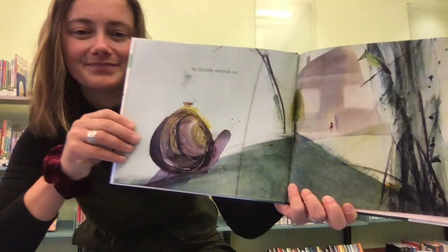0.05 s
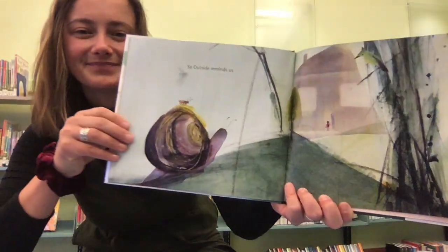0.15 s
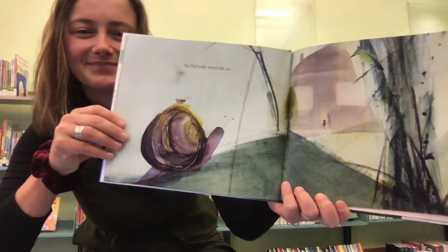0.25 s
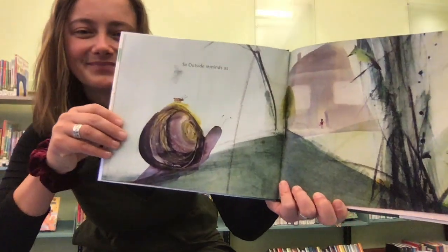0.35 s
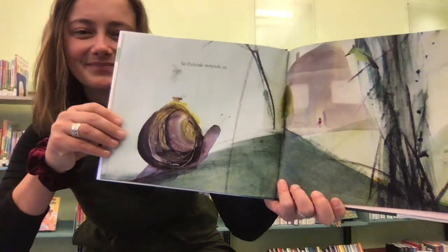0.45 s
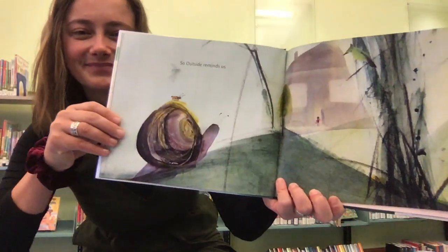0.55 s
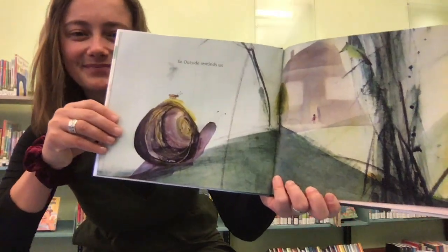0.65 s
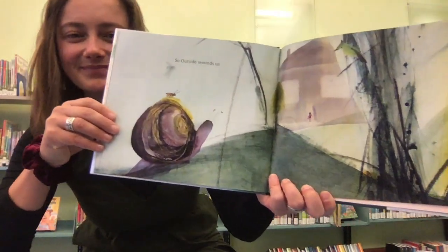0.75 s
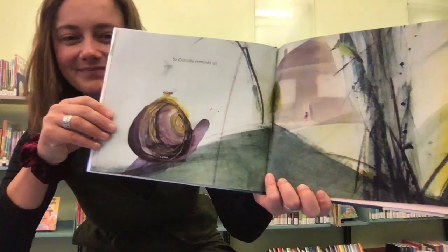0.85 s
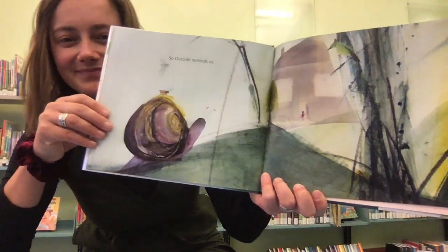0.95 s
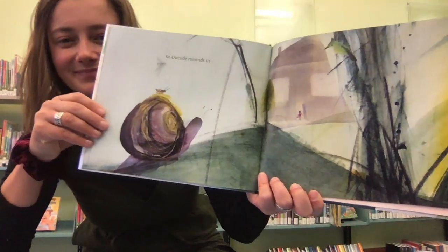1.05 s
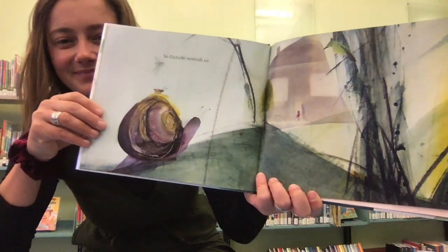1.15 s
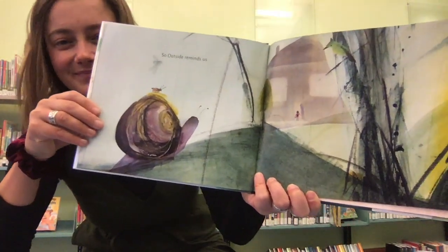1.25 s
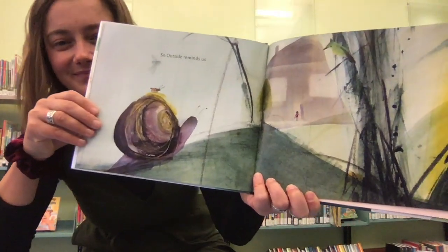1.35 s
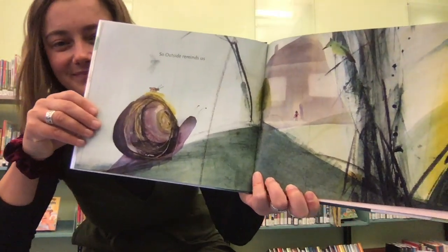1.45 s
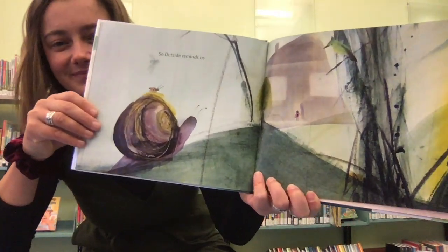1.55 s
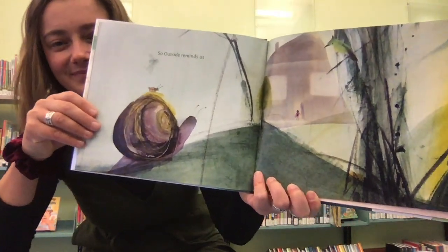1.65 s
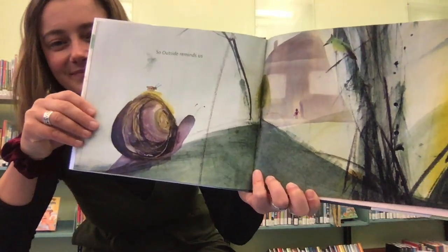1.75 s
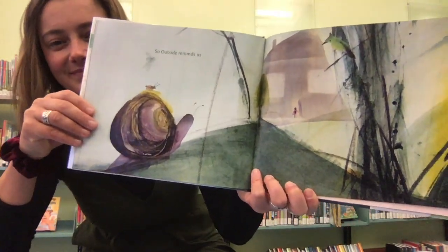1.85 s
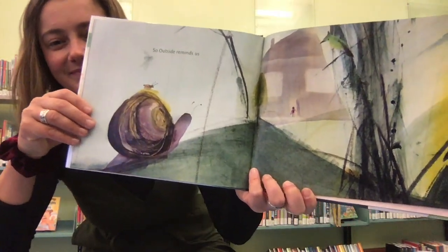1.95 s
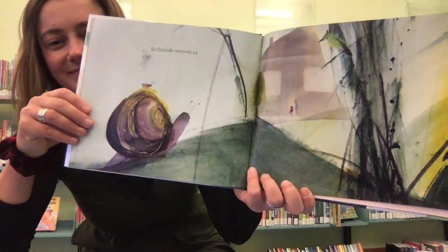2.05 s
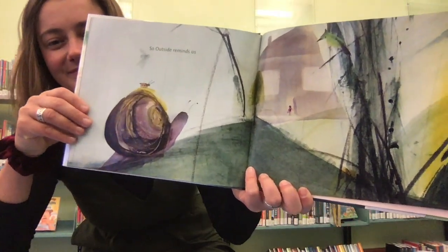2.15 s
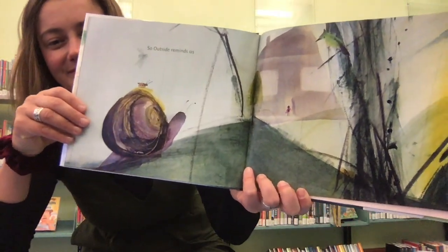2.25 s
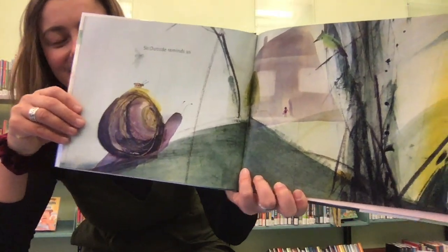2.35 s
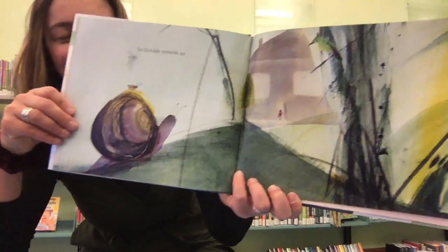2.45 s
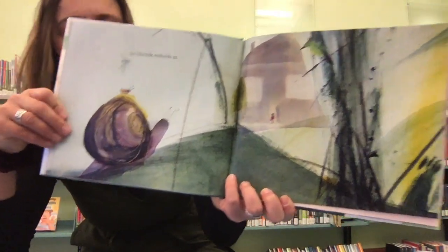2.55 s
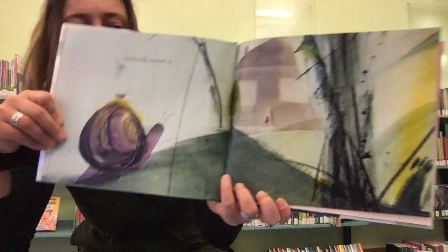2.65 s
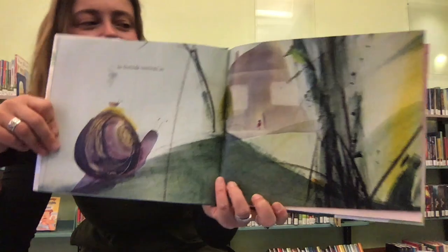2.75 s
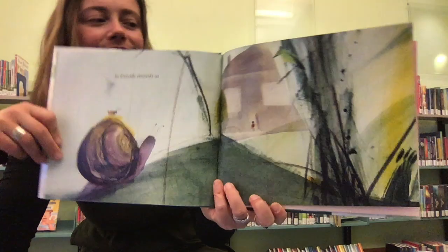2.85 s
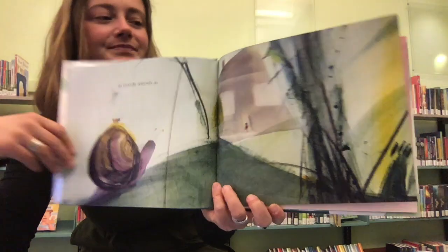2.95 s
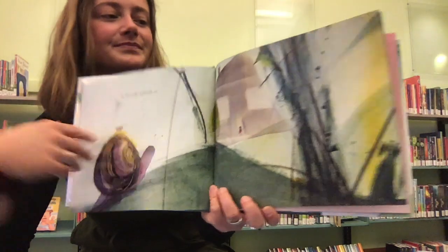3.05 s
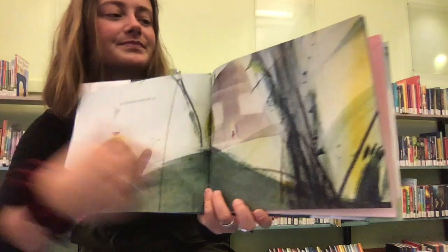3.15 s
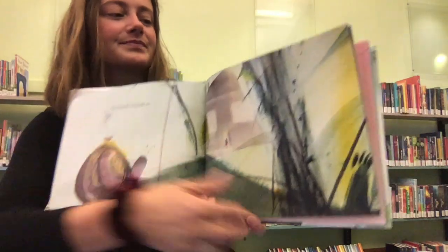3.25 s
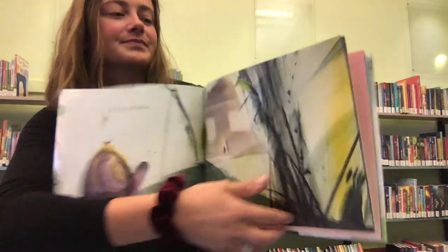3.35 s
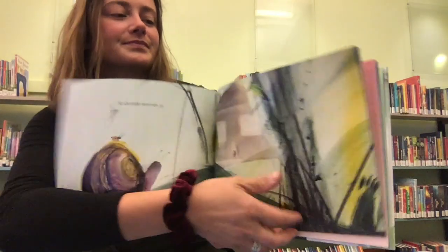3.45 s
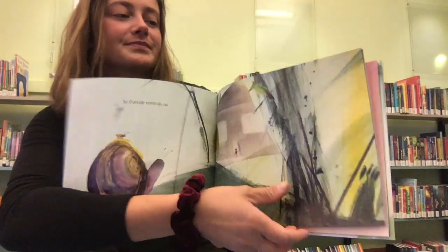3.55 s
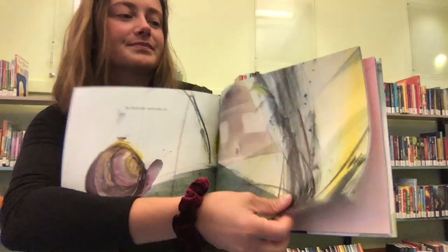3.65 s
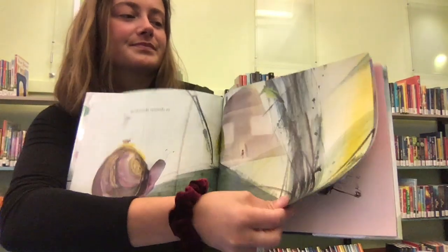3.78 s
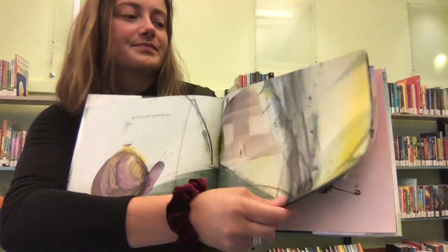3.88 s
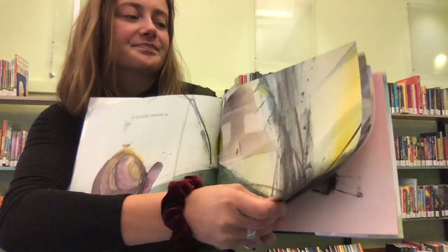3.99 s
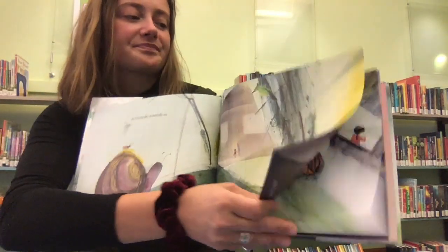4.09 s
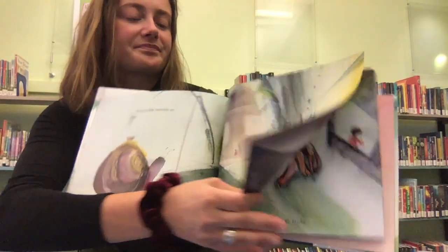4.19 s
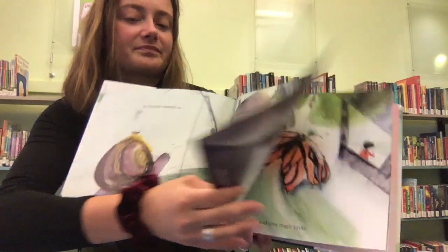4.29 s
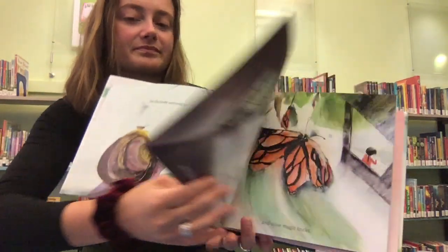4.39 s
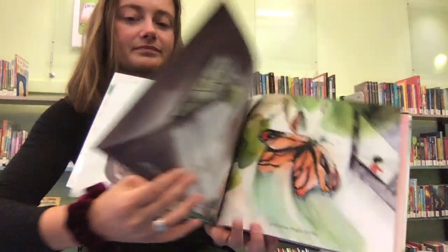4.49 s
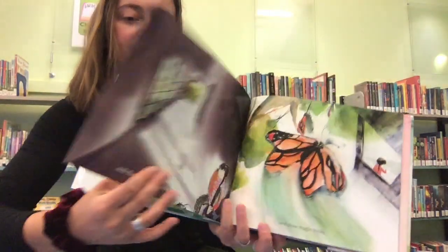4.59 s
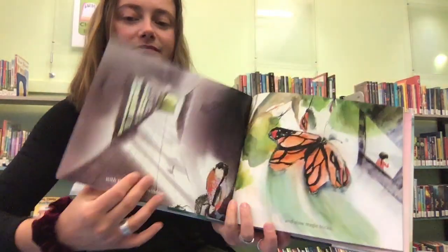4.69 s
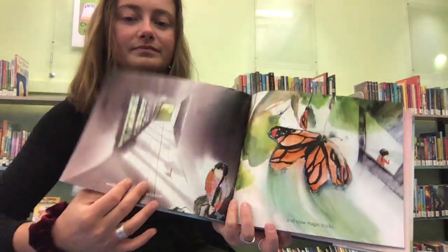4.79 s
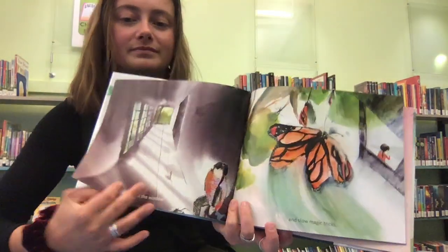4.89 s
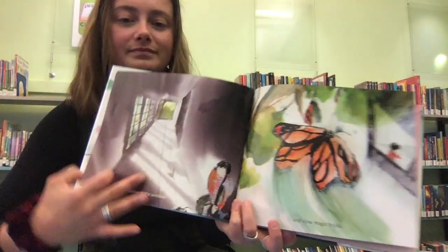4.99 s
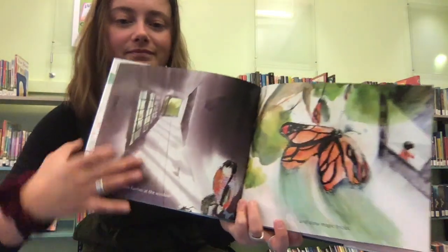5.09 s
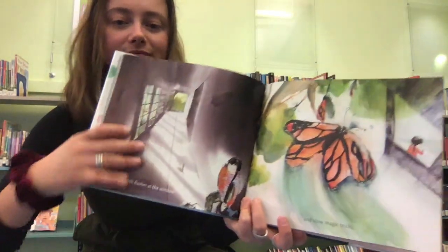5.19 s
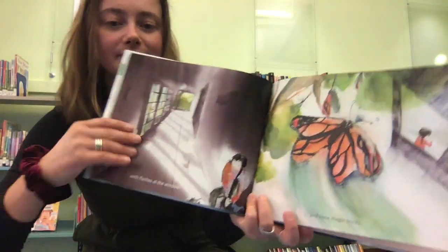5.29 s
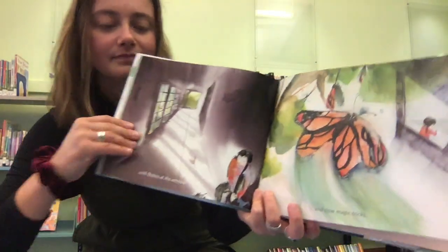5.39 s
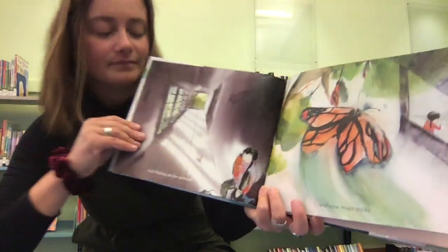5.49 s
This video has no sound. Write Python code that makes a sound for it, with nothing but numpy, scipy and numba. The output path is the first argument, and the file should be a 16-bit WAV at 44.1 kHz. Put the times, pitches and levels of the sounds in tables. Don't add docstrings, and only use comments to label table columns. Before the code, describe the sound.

A large picture book is handled near a laptop microphone. At first there is only dull air rumble, faint hum, tiny creaks and ticks. Small paper snaps gather midway, a woody knock of the boards follows, then a dense, much louder crackle of stiff paper as the page turns. A few flaps, low bumps and a soft palm stroke end it in a dry, slightly boxy room.

```python
import sys
import numpy as np
from scipy import signal
from scipy.fft import rfft, irfft
from scipy.io import wavfile
from scipy.ndimage import uniform_filter1d
from numba import njit

SR = 44100
rng = np.random.default_rng(int(sys.argv[2]) if len(sys.argv) > 2 else 0)


def generate_wav(signal):
    frames = np.transpose(np.atleast_2d(signal))
    scaled = np.clip(frames, -1, 1) * 32767
    pcm = np.round(scaled).astype(np.int16)
    wavfile.write(sys.argv[1], SR, pcm)


def voltage_ratio(level):
    return 10 ** (np.asarray(level, float) / 20)


N = 243740

# frequency in Hz, level in dB.
HISS_SPECTRUM = [(1500, 12.5), (2500, 7.5), (4000, 3), (7000, -3.5), (9000, -12.5), (16000, -10)]
# frequency in Hz, level in dB.
SHEET_SPECTRUM = [(150, -1.5), (500, -2), (1000, -2), (1800, -3), (2800, -7.5), (3200, -21), (5000, -20.5),
                  (16000, -62)]


def level(x, db):
    return x * voltage_ratio(db) / np.sqrt(np.mean(x ** 2))


def curve(rows):
    s, *columns = np.transpose(rows)
    return [np.interp(np.arange(N) / SR, s, c) for c in columns]


@njit
def svf(x, hz, width):
    y, b, l = np.empty(len(x)), 0., 0.
    for i in range(len(x)):
        g, k = np.tan(np.pi * hz[i] / SR), width[i] / hz[i]
        v = (b + g * (x[i] - l)) / (1 + g * (g + k))
        b, l, y[i] = 2 * v - b, l + 2 * g * v, k * v
    return y


def band(x, hz, width):
    return svf(x, hz + np.zeros(len(x)), width + np.zeros(len(x)))


def colour(x, table):
    hz, db = np.transpose(table)
    f = np.maximum(np.arange(N // 2 + 1) * SR / N, 1)
    return irfft(rfft(x) * voltage_ratio(np.interp(np.log(f), np.log(hz), db)), N)


def walk(rate):
    k = int(SR / rate)
    held = np.repeat(rng.standard_normal(N // k + 1), k)
    slewed = uniform_filter1d(uniform_filter1d(held, k), k)
    return 2 * np.tanh(0.91 * slewed[:N])


def add(out, s, x):
    i = int(s * SR)
    out[i:i + len(x)] += x[:N - i]


def grit(per_s, spread_db, smooth):
    size_db = spread_db * np.minimum(rng.exponential(size=N), 3)
    slips = (rng.random(N) < per_s / SR) * voltage_ratio(size_db) * rng.standard_normal(N)
    return level(slips, 0) + smooth * rng.standard_normal(N)


def strokes(rows, sag_db, stop_db_s):
    t = np.arange(0, N, 32) / SR
    s, rise, hold, db, *more = np.transpose(rows)[:, :, None]
    held = (t - s - rise) / np.maximum(hold, .002)
    late = np.maximum(t - s - rise - hold, 0)
    db = db - sag_db * np.clip(held, 0, 1) - stop_db_s * late
    swell = np.sin(np.pi / 2 * np.clip((t - s) / np.maximum(rise, .002), 0, 1)) ** 2
    power = (voltage_ratio(db) * swell) ** 2 + 1e-16
    total = power.sum(axis=0)
    blended = [(power * m).sum(axis=0) / total for m in more]
    return [np.interp(np.arange(N) / SR, t, c) for c in [np.sqrt(total)] + blended]


def snaps():
    # start in seconds, peak in dB, sheet ring in Hz, ring level in dB under the first pulse.
    grip_snaps = [(.364, -57, 1020, -4), (.384, -56, 977, -4), (.41, -58, 1200, -4), (.495, -52, 1000, -5),
                  (.6, -56, 950, -4), (1.134, -50, 950, -2.5), (1.212, -45, 886, -15),
                  (1.529, -40.5, 1060, -3), (1.697, -53, 780, 3), (2.355, -40.5, 1420, -22),
                  (2.616, -41, 880, -9.5), (2.644, -36, 790, -6), (2.671, -40, 775, -15),
                  (2.717, -50, 820, -1), (2.737, -38.5, 810, -3.5), (2.764, -33, 925, -9),
                  (2.877, -47, 920, -1), (2.917, -36, 675, -8), (2.956, -44.5, 778, -7),
                  (3.107, -41.5, 1240, -1), (3.309, -43, 1340, -11), (3.315, -42, 1100, -2.5),
                  (3.37, -36, 900, -8), (3.644, -44, 1000, 3.5)]
    page_snaps = [(3.86, -29, 1210, 1.5), (3.889, -32, 970, -2), (3.96, -35, 1550, 2),
                  (4.031, -28, 1120, -7), (4.048, -33, 770, 0.5), (4.093, -29, 1960, -3),
                  (4.1125, -16.5, 900, -12), (4.138, -14.5, 930, -5), (4.186, -13, 900, -7),
                  (4.225, -14, 800, -11), (4.2615, -13.5, 920, -12), (4.3, -16, 900, -16),
                  (4.315, -24.5, 910, -0.5), (4.3195, -21, 900, -10), (4.3385, -25, 900, -10),
                  (4.0802, -31, 1100, -10), (4.3555, -22, 1000, -6), (4.447, -44.5, 673, 0),
                  (4.483, -45, 700, 0), (4.553, -24.5, 746, -28), (4.661, -37, 920, -8),
                  (4.943, -28, 800, -4.5), (4.987, -31.5, 785, -4)]
    out, t = np.zeros(N), np.arange(3000) / SR
    rows = grip_snaps + page_snaps
    for (s, db, hz, ring_db), n in zip(rows, rng.standard_normal((len(rows), len(t)))):
        first = -np.sin(2 * np.pi * hz * t) * np.exp(-(t * hz / 1.04) ** 2)
        ring_cycles = 13.5 - 0.79 * max(db, -32.)
        fade = voltage_ratio(-60 * t * hz / ring_cycles) * np.minimum(t * hz, 1)
        ring = level(band(n, hz, .5 * hz) * fade, ring_db) * np.sqrt(np.mean(fade ** 2))
        add(out, s + 0.00064, voltage_ratio(db + 1.5) * (first + ring))
    return colour(out, SHEET_SPECTRUM)


def slide():
    # start in seconds, rise in seconds, hold in seconds, level in dB, sheet resonance in Hz.
    rubs = [(2.3, 0.11, 0.21, -61.5, 950), (2.61, .01, 0.21, -63, 850), (2.85, 0.048, .18, -60.5, 850),
            (3.105, .02, 0.026, -66.5, 1220), (3.21, .08, .02, -65, 790), (3.3, .01, .06, -55.5, 950),
            (3.34, 0.024, 0.12, -54, 740), (3.5, .02, 0.098, -64, 745), (3.605, .04, .045, -55, 900),
            (3.735, 0.036, 0.044, -44.5, 1310), (3.82, 0.0088, .05, -50, 1200),
            (3.877, 0.016, 0.052, -39, 1150), (3.94, 0.018, .05, -44.5, 1600),
            (4.035, 0.029, .04, -43, 950), (4.1, .01, .05, -50, 875), (4.19, 0.018, .1, -51, 840),
            (4.3, .02, .13, -61, 720), (4.444, .004, 0.043, -51, 1000), (4.55, 0.053, .03, -51, 760),
            (4.63, .01, 0.21, -56, 790), (4.82, 0.056, .13, -53.5, 777), (5.04, .15, 0.13, -62.5, 761),
            (5.28, 0.091, 0.16, -60.5, 845)]
    # start in seconds, rise in seconds, hold in seconds, level in dB, fine fibre in dB over the hiss.
    skin_strokes = [(2.61, .02, 0.19, -73.5, -21), (2.85, .02, .21, -74, -6.5),
                    (3.105, 0.018, 0.018, -78, -1), (3.3, .005, .04, -71, -10), (3.315, .02, .125, -61, -5),
                    (3.455, .005, .065, -70, -25), (3.69, .01, .05, -65, -12),
                    (3.625, 0.045, 0.027, -62, -4), (3.73, .05, .026, -47, -5), (3.8, .006, .05, -52, -13),
                    (3.85, .01, .03, -55, -12), (3.875, .02, .05, -40.5, -14),
                    (3.935, 0.015, .08, -47.5, -10.5), (4.025, 0.03, .009, -51, -2),
                    (4.066, .02, 0.05, -54.5, -15), (4.12, .02, .05, -57, -16), (4.2, .02, .03, -63, -15),
                    (4.24, .01, .03, -63, -15), (4.27, .05, .075, -53, -17), (4.38, .01, .05, -72, -13),
                    (4.444, .004, .045, -63.5, -16), (4.55, .02, .09, -62, -10),
                    (4.64, .005, 0.21, -65, -10), (4.79, .1, .085, -57.5, -11), (4.95, 0.04, .055, -59, -9),
                    (5.04, .004, .05, -65, -6), (5.05, .005, 0.13, -80, 11), (5.14, .06, .1, -71, -4),
                    (5.27, .02, 0.13, -74.5, 0.5), (5.41, 0.059, .07, -63.5, -12)]
    # frequency in Hz, level in dB.
    fibre_spectrum = [(3000, -32), (7000, -4), (8600, -12), (10200, -4.5), (12000, -6), (16000, -2.5)]
    # time in seconds, frequency in Hz, level in dB.
    slit_whistle = [
        (4.94, 6800, -100),
        (4.98, 7200, -75),
        (5.04, 8000, -70),
        (5.05, 8000, -110),
    ]
    # time in seconds, frequency in Hz, level in dB.
    palm_pocket = [
        (5.1, 4800, -88),
        (5.18, 4800, -70),
        (5.28, 4600, -70),
        (5.35, 3900, -61),
        (5.41, 4150, -68.5),
        (5.47, 4650, -60),
        (5.53, 4630, -79),
    ]
    rubbing, hz = strokes(rubs, sag_db=4, stop_db_s=450)
    sliding, fibre_db = strokes(skin_strokes, sag_db=4.5, stop_db_s=800)
    t = np.arange(N) / SR
    fits = 1.3 * walk(70)

    rub = grit(2500, 3.0, smooth=0.88)
    resonance = band(band(rub, hz, 0.52 * hz), hz, 0.52 * hz)
    broad = 0.42 * band(rub, 1.42 * hz, 2.8 * hz)
    sheet = level(colour(resonance + broad, SHEET_SPECTRUM), 0.46) * voltage_ratio(fits + 1.7 * walk(90))

    fine = grit(4000, 4.1, smooth=1.2) * voltage_ratio(0.7 * fits)
    gaps = sum(band(fine, g * 2 ** (0.17 * walk(6)), 0.24 * g) for g in (4500., 6800.))
    hiss = level(colour(fine + 1.6 * gaps, HISS_SPECTRUM), 0.55) * voltage_ratio(0.8 * walk(25))
    fibre = level(colour(fine, fibre_spectrum), 8.6) * voltage_ratio(fibre_db + 1.5 * walk(32))

    palm_hz, palm_db = curve(palm_pocket)
    pocket = band(band(rng.standard_normal(N), palm_hz, 900.), palm_hz, 750.)
    palm = level(pocket, -2.2) * voltage_ratio(palm_db + 3.0 * walk(35))
    edge_hz, edge_db = curve(slit_whistle)
    edge = level(band(band(fine, edge_hz, 600.), edge_hz, 600.), 0) * voltage_ratio(edge_db)
    return edge + rubbing * sheet + sliding * (hiss + fibre) + (t > 5.1) * palm


def crunch():
    # start in seconds, length in seconds, level in dB, hiss in dB over the body, centre of the body in Hz.
    rough_bursts = [(0.328, 0.31, -74.5, -40, 1110), (5.265, 0.1, -59.5, -40, 1750),
                    (5.425, 0.082, -59.5, -40, 1750), (0.442, 0.008, -65, -32, 2100),
                    (2.479, 0.1, -64, -43, 2300), (3.305, 0.044, -59, -4, 1800), (3.42, .06, -50, -45, 300),
                    (4.65, .14, -59, -40, 260), (4.553, .045, -50, -40, 280),
                    (4.032, 0.0033, -38.5, -11, 1180), (2.754, 0.015, -57.5, -8, 895),
                    (3.425, 0.0053, -34.5, -48, 1390), (3.75, 0.05, -40.5, -5.5, 1530),
                    (4.094, 0.007, -38, -3, 1900), (4.139, 0.011, -31.5, -13, 1040),
                    (4.157, 0.015, -34, -39, 1010), (4.301, 0.0084, -33, -26, 820),
                    (4.351, 0.012, -33, -5, 1500), (4.55, 0.019, -42.5, -17, 940),
                    (5.03, 0.015, -52, 6, 2840), (1.531, .043, -70, 4, 1600), (1.575, .07, -62, -40, 140),
                    (4.635, .05, -52, -40, 115), (3.369, .0035, -41, -22, 1100),
                    (3.81, .012, -42, -14, 1500), (4.146, .009, -35.5, -14, 2600),
                    (1.485, .015, -66, -12, 1400), (3.915, .012, -42, -8, 1000), (3.29, .06, -58, -40, 170),
                    (4.16, .018, -44, -12, 2000), (4.358, .008, -42, -6, 2600), (.245, .02, -66, -30, 1900)]
    rub = grit(3000, 2.0, smooth=.8)
    bright = level(colour(rub, HISS_SPECTRUM), 0)
    body, hiss = np.zeros(N), np.zeros(N)
    for s, d, db, hiss_db, hz in rough_bursts:
        i = int(s * SR)
        part = slice(i, i + int((d + .06) * SR))
        t = np.arange(len(rub[part])) / SR
        swell = np.sin(np.pi / 2 * np.clip(t / (0.33 * d), 0, 1)) ** 2
        gate = swell * voltage_ratio(-2000 * np.maximum(t - d, 0))
        creases = level(band(band(rub[part], hz, 1.1 * hz), hz, 1.64 * hz), 2.3)
        add(body, s, voltage_ratio(db) * gate * creases)
        add(hiss, s, voltage_ratio(db + hiss_db) * gate * bright[part])
    return colour(body, SHEET_SPECTRUM) + hiss


def ticks():
    # start in seconds, peak in dB, crackle in dB after the crack.
    bend_ticks = [(0.4459, -58, -14), (1.135, -61, -20), (1.696, -54.5, -17.5), (2.8795, -56.5, -10),
                  (2.9555, -57, -12), (2.993, -48, -13), (3.0505, -57, -12), (3.1067, -50.5, -8),
                  (3.306, -49, -13), (3.3144, -42, -15), (3.3268, -46, -10), (3.3688, -48, -10),
                  (3.4112, -44, -8.5), (4.031, -32.5, -12), (4.0946, -38, -10), (4.1127, -32, -19),
                  (4.138, -28, -12), (4.2262, -27.5, -12.5), (4.2621, -27, -20), (4.2998, -31, -22),
                  (4.3204, -39, -15), (4.3385, -36, -18), (4.446, -52.5, -2.5), (4.4827, -48.5, -10.5),
                  (4.5521, -51.5, -11), (4.6234, -50, -8), (4.8636, -49, -8), (.43, -64, -12),
                  (3.2923, -66, -10), (3.4262, -53, -8), (3.561, -70, -10), (4.0802, -44, -14),
                  (4.316, -44, -16), (3.6467, -54, -10), (4.989, -54, -12)]
    # start in seconds, peak in dB, crackle in dB after the crack, brightest frequency in Hz.
    dry_ticks = [(0.167, -58.5, -18, 2840), (0.2529, -48, -18, 4830), (0.6476, -50.5, -18, 10200),
                 (0.7967, -52.5, -14, 9900), (1.5276, -44, -7, 3600), (2.7383, -51, -26, 4140),
                 (2.7623, -58.5, -5.5, 3830), (3.387, -54, -13, 3860), (3.4421, -40.5, -14.5, 3520),
                 (3.6616, -49.5, -10, 6360), (3.677, -49.5, -10.5, 6200), (3.8613, -33.5, -12.5, 3850),
                 (4.0068, -41, -21, 6000), (4.1858, -25.5, -19, 7200), (.629, -61, -16, 9000),
                 (3.8675, -42, -16, 6000), (4.0005, -45, -16, 6000), (4.0315, -37, -18, 7500),
                 (4.0395, -39, -18, 7000), (4.0965, -45, -8, 10000), (4.3575, -40, -6, 5500),
                 (4.943, -56, -12, 8000)]
    out, t = np.zeros(N), np.arange(4000) / SR
    bend_hz = 2410
    rows = [(*row, bend_hz) for row in bend_ticks] + dry_ticks
    for (s, db, crackle_db, hz), n in zip(rows, rng.standard_normal((len(rows), len(t)))):
        shape = np.minimum(t / 0.00015, 1) * np.exp(-t / 0.0004)
        crack = shape * n * np.sqrt(np.sum(shape ** 2) / np.sum((shape * n) ** 2))
        lasts_s = np.interp(db, [-40, -30], [.0038, .0068])
        crackle = np.exp(-(t / lasts_s) ** 8) + 0.18 * voltage_ratio(-60 * t / 0.15)
        burst = crack + n * voltage_ratio(crackle_db) * crackle
        tuned = band(band(burst, hz, .5 * hz), hz, 1.05 * hz)
        add(out, s + .0005, voltage_ratio(db + 7.5) * (tuned + 0.6 * band(burst, 4750.0, 6700.0)))
    return signal.sosfilt(signal.butter(3, 1500, "high", fs=SR, output="sos"), out)


def knocks():
    # start in seconds, peak in dB, note in Hz, time to fall 60 dB in seconds.
    board_knocks = [(3.414, -29.5, 750, 0.09), (3.424, -14.5, 760, 0.045), (3.434, -16, 760, 0.048),
                    (3.428, -14.5, 1170, 0.03), (3.453, -28, 720, 0.065), (4.562, -27.5, 704, 0.082),
                    (5.316, -32.5, 190, 0.046), (4.678, -33.5, 805, 0.038), (4.9595, -37, 800, .04),
                    (3.9605, -29, 1650, .09), (4.0945, -32, 1960, .04), (4.306, -26, 850, .04)]
    out, t = np.zeros(N), np.arange(6000) / SR
    wobble = rng.standard_normal((len(board_knocks), len(t)))
    for _ in range(2):
        wobble = uniform_filter1d(wobble, size=80, axis=1)
    for (s, db, hz, t60), w in zip(board_knocks, wobble):
        push = 1 - np.exp(-(t * hz / 0.36) ** 2)
        rough_note = (1 + 0.63 * w) * np.sin(2 * np.pi * hz * t + 7.1 * w)
        add(out, s, voltage_ratio(db - 60 * t / t60) * push * rough_note)
    return out


def seat():
    # frequency in Hz, width in Hz, level in dB.
    frame_modes = [(950, 460, 12), (2750, 320, -5), (4800, 500, -12), (6200, 2000, -11.5)]
    # start in seconds, peak in dB.
    late_slips = [
        (0.1617, -58),
        (0.167, -56.5),
        (0.2032, -62.5),
        (0.2301, -62),
        (0.2444, -53),
        (0.2612, -52.5),
    ]
    slips, t = np.zeros(N), np.arange(600) / SR
    k = np.arange(9)
    run_s = .0225 + .0116 * k + .00021 * k ** 2
    run_db = -58 - 4 * np.exp(-k / 1.5)
    rows = [*np.transpose([run_s, run_db]), *late_slips]
    for (s, db), n in zip(rows, rng.standard_normal((len(rows), len(t)))):
        add(slips, s, voltage_ratio(db + 12) * n * np.minimum(t / 0.00084, 1) * np.exp(-t / 0.0022))
    scrape = np.interp(np.arange(N) / SR, [0, .04, .14, .3], [0.75, 1.3, 0.48, 0.089])
    slips += voltage_ratio(-65.5) * rng.standard_normal(N) * scrape

    groan_s, groan_length_s, groan_hz, groan_db = .16, .22, 200, -62
    u = np.clip((np.arange(N) / SR - groan_s) / groan_length_s, 0, 1)
    swell = np.sqrt(np.sin(np.pi * u) + 1e-12)
    groan = voltage_ratio(groan_db) * swell * np.sin(2 * np.pi * groan_hz * groan_length_s * u)
    frame = sum(voltage_ratio(db + 5.5) * band(band(band(slips, hz, w), hz, w), hz, 2.9 * w)
                for hz, w, db in frame_modes)
    return groan + frame


def desk():
    # start in seconds, rise in seconds, hold in seconds, level in dB.
    jolts = [(0.0, 0.096, 0.71, -50), (.86, 0.092, 0.36, -50.5), (1.38, .05, .6, -49),
             (2.2, 0.25, 0.47, -47.5), (3.03, .12, .14, -46.5), (3.31, .06, .03, -35),
             (3.43, 0.028, 0.028, -34.5), (3.55, .03, .2, -41), (3.81, .07, 0.065, -42.5),
             (3.96, 0.13, 0.045, -42), (4.2, .09, .1, -44), (4.55, 0.027, .02, -39),
             (4.72, 0.054, .08, -47), (4.88, .05, .25, -53), (5.38, .07, .1, -38)]
    sway = band(band(rng.standard_normal(N), 32., 17.7), 41.2, 30.)
    sway /= np.sqrt(uniform_filter1d(sway ** 2, size=4000)) + 0.15 * sway.std()
    return level(sway, -2.53) * strokes(jolts, sag_db=3.5, stop_db_s=120)[0]


def air():
    # frequency in Hz, level in dB per Hz.
    air_spectrum = [(26, -22), (45, -4.5), (75, -1), (93, -16), (122, -8), (148, -16.5), (193, -21),
                    (431, -21), (606, -23.5), (1110, -30.5), (1500, -39), (2600, -46), (3020, -52),
                    (4340, -55), (8790, -58.5), (10200, -59), (15000, -95)]
    air_db, flicker_db, hum_hz, hum_db = -56.5, 1.8, 115.6, -69.5
    flow = np.zeros(N)
    for hz in 50 * 2. ** np.arange(9):
        flow += band(rng.standard_normal(N), hz, hz * 0.69) * voltage_ratio(flicker_db * walk(7)) / np.sqrt(hz)
    white = colour(flow, [(50, 0), (16000, 24.5)])
    hum = np.sin(2 * np.pi * hum_hz * np.arange(N) / SR) * voltage_ratio(hum_db + 2.0 * walk(1.7))
    return level(colour(white, air_spectrum), air_db) + hum


def room(x, t60=0.24, wet_db=-24):
    t = np.arange(int(.4 * SR)) / SR
    tail = band(rng.standard_normal(len(t)), 600.0, 2100.0) * voltage_ratio(-60 * t / t60) * (t > .004)
    return x + signal.fftconvolve(x, tail * voltage_ratio(wet_db) / np.sqrt(np.sum(tail ** 2)))[:N]


def duck(near):
    depth_db, knee_db, recover_s = 3.5, -48, .7
    keep = np.exp(-1 / (recover_s * SR))
    busy = signal.lfilter([(1 - keep) ** 2], [1, -2 * keep, keep ** 2], near ** 2) / voltage_ratio(knee_db) ** 2
    return voltage_ratio(-depth_db * busy / (1 + busy))


def scene():
    # frequency in Hz, level in dB.
    mic_port = [(2600, -1), (3300, -2), (4300, -1), (8500, -3.5), (10000, -1.5), (10900, -9),
                (11800, -16.5), (15500, -15), (16500, -48)]
    near = snaps() + ticks() + crunch() + knocks() + slide() + seat()
    mix = colour(room(near), mic_port) + desk() + air() * duck(near)
    return mix[None]


def top_cut(x):
    return signal.sosfilt(signal.butter(12, 16300, fs=SR, output="sos"), x)


def record(dry):
    return top_cut(dry)


dry = scene()
out = record(dry)
generate_wav(out)
```